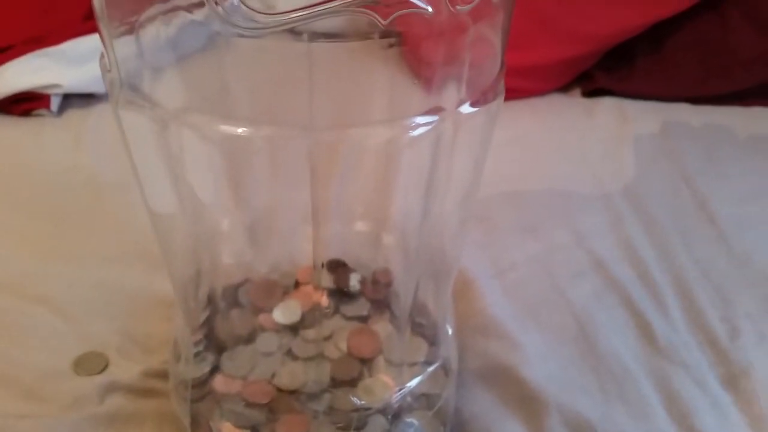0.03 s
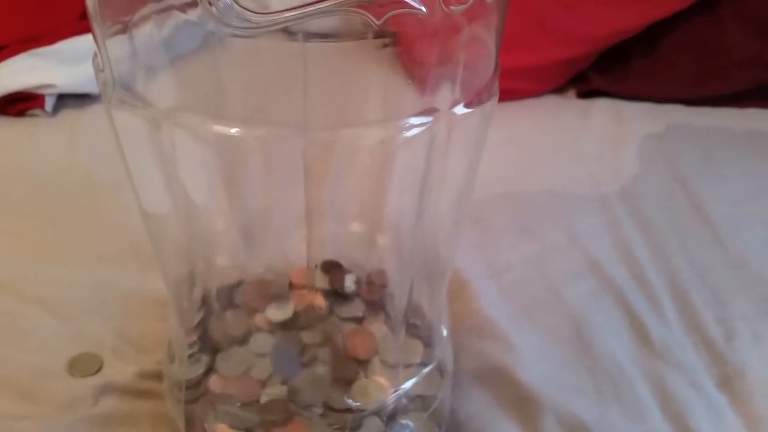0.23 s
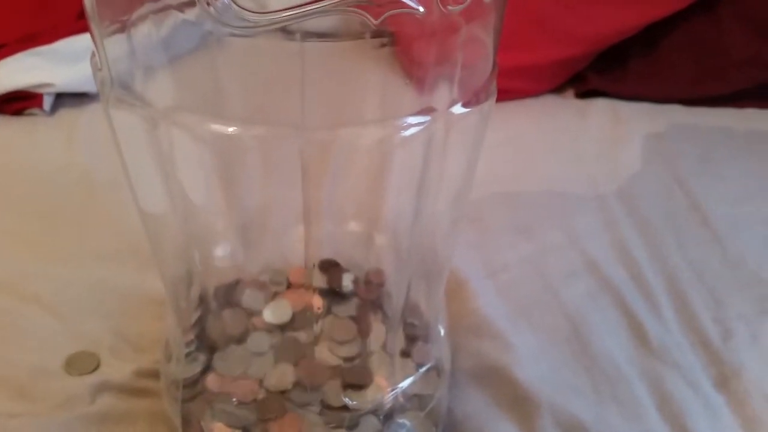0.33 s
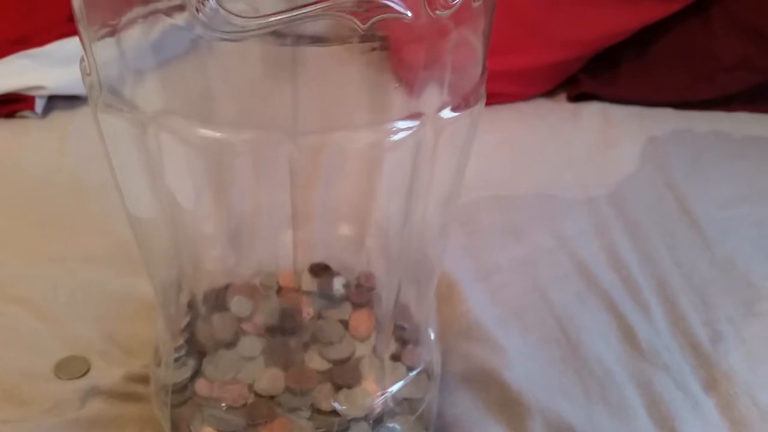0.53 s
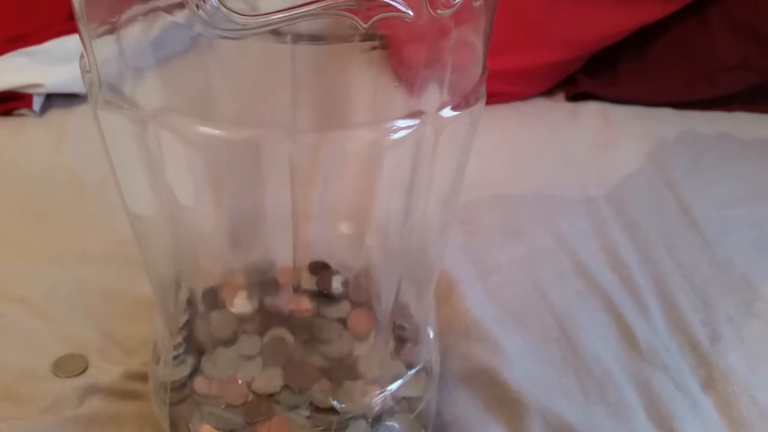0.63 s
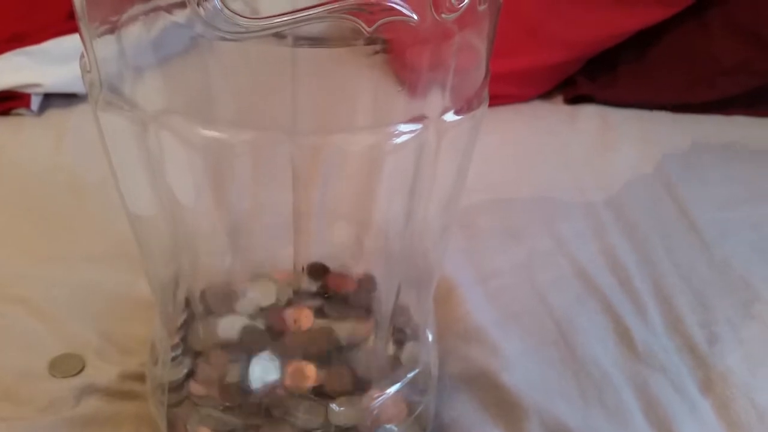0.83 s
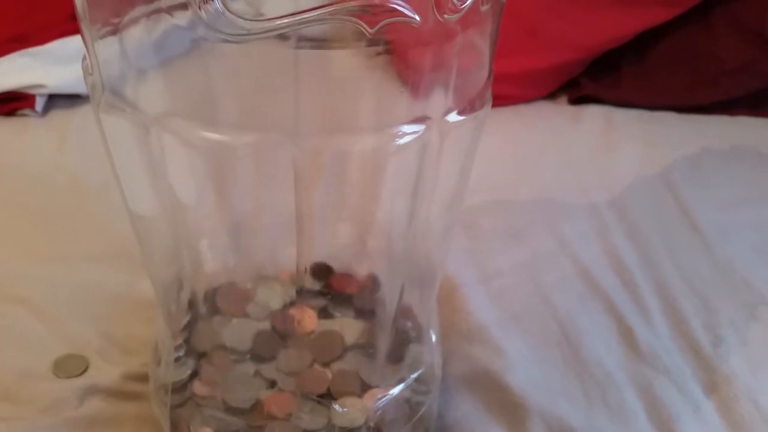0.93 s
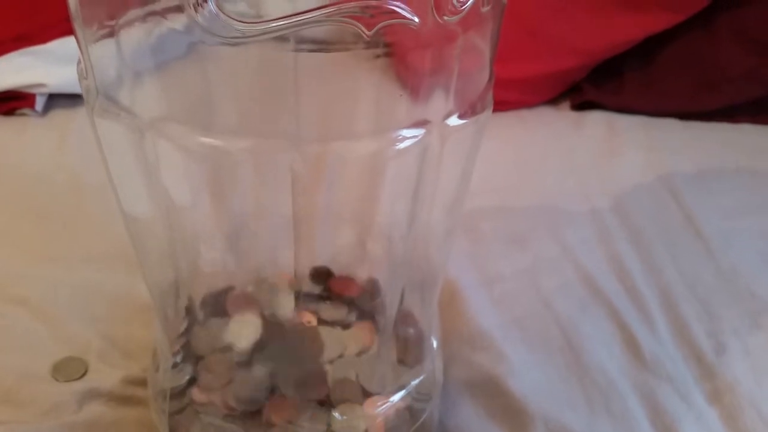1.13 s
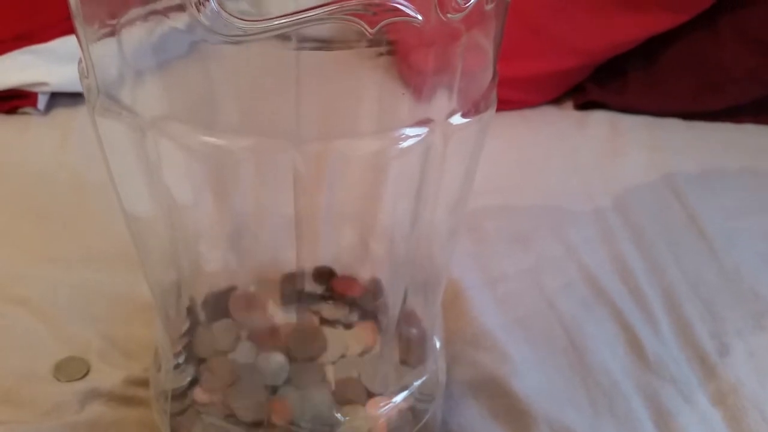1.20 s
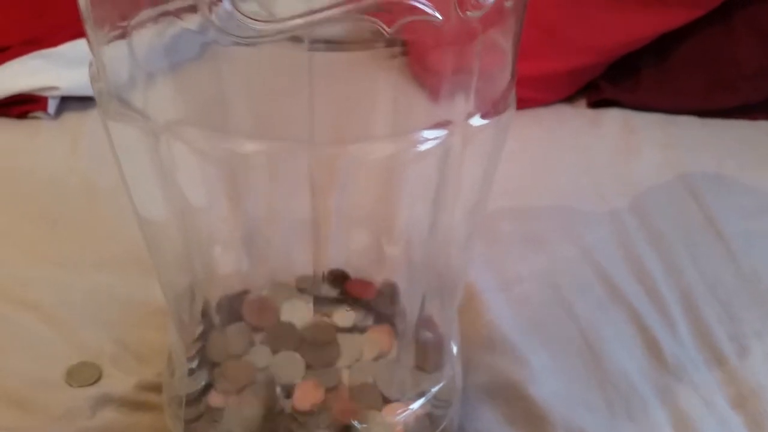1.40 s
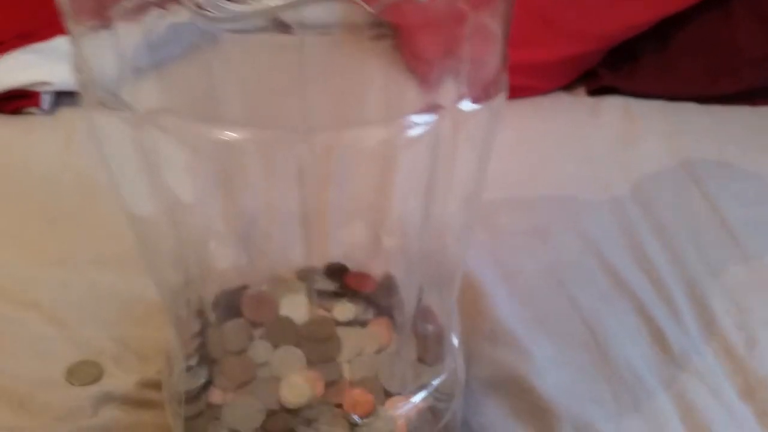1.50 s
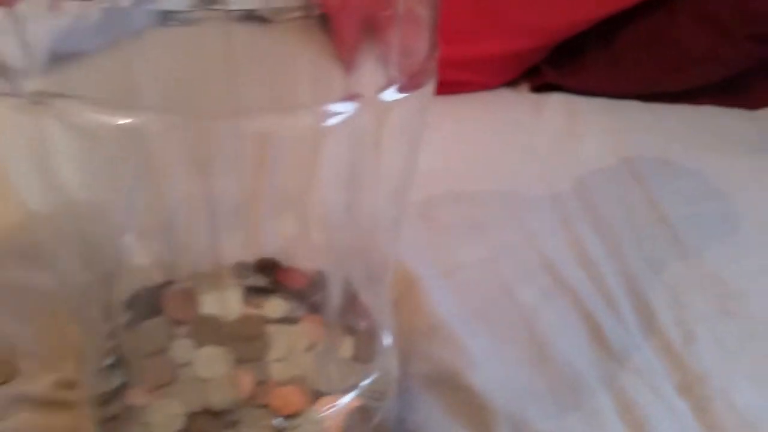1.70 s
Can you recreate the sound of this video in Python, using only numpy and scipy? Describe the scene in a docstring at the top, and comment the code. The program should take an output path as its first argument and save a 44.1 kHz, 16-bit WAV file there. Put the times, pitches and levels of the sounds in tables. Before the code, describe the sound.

Coins drop one after another into a big plastic bottle partly filled with coins. After a faint rustle, each landing knocks the hollow shell and sets the heap clinking with a very high ring. Indoors, close to the microphone.

```python
"""A faint rustle and a light clink, then coins land in a big plastic bottle partly filled with coins.
Each landing knocks the plastic shell, thumps the soft bed under it and sets the heap clashing.
Loose coins ring on very high, and the bottle's hollow prolongs the knocks.
Heard indoors, close to the microphone."""
import sys
import numpy as np
from scipy import signal
from scipy.fft import rfft, irfft, next_fast_len
from scipy.io import wavfile
from scipy.ndimage import uniform_filter1d, map_coordinates

SR = 44100
rng = np.random.default_rng(int(sys.argv[2]) if len(sys.argv) > 2 else 0)


def to_wav(sig):
    """Store sig (one row per channel, or 1-D mono) as 16-bit WAV at the path in sys.argv[1].

    Samples outside -1..1 are clipped; the rate is SR.
    """
    pcm = np.clip(np.atleast_2d(sig), -1, 1) * 32767
    pcm = np.round(pcm).astype(np.int16)
    wavfile.write(sys.argv[1], SR, pcm.T)  # frames by channels


N = 77175
T = np.arange(SR // 2) / SR  # time axis of one event, s


def amp(db):
    """Decibels to gain."""
    return 10 ** (np.asarray(db) / 20)


def unit(x):
    """Scale to rms 1."""
    return x / np.sqrt(np.mean(x ** 2) + 1e-20)


def onset_unit(x):
    """Scale the first 10 ms to rms 1."""
    return x / np.sqrt(np.mean(x[..., :SR // 100] ** 2) + 1e-20)


def along(points, hz):
    """Interpolate (Hz, value) points on a log axis."""
    knots_hz, values = np.transpose(points)
    return np.interp(np.log(hz + 1), np.log(knots_hz + 1), values)


def rise(attack_s):
    """Exponential attack from 0 to 1."""
    return 1 - np.exp(-T / attack_s)


def fade(t60_s):
    """Decay of 60 dB in t60_s."""
    return np.exp(-np.log(1000) * T / t60_s)


def wobble(knots_per_s, size):
    """Smooth random curve."""
    return map_coordinates(rng.standard_normal(4096), [np.arange(size) * knots_per_s / SR], mode="wrap")


def coloured(x, db_of_hz):
    """Minimum-phase filter with the given gain curve."""
    n = x.shape[-1]
    m = 2 * next_fast_len(n)
    cepstrum = irfft(np.log(amp(db_of_hz(np.fft.rfftfreq(m, 1 / SR))) + 1e-6))
    cepstrum[1:m // 2] *= 2
    cepstrum[m // 2 + 1:] = 0
    return irfft(rfft(x, m) * np.exp(rfft(cepstrum)), m)[..., :n]


def noise(spectrum, size=len(T)):
    """Two independent noises of rms 1, shaped by (Hz, dB) points."""
    return unit(coloured(rng.standard_normal((2, size)), lambda hz: along(spectrum, hz)))


def spread(pair, width):
    """Mid and side to left and right."""
    mid, side = pair
    return np.array([mid + width * side, mid - width * side]) / np.hypot(1, width)


def sine(hz):
    """Mono sine of peak 1."""
    return np.sin(2 * np.pi * hz * T)


def tone(hz):
    """Sine of rms 1, random phase per channel."""
    return np.sqrt(2) * np.sin(2 * np.pi * (hz * T + rng.random((2, 1))))


def add(track, start_s, sound):
    """Mix a sound into the track."""
    i = max(0, round(start_s * SR))
    track[:, i:i + len(T)] += sound[:, :N - i]


# Each row: frequency in Hz, relative level in dB.
RUSTLE_SPECTRUM = [(30, -22.5), (75, 1), (130, -8), (240, 6), (420, 1.5), (800, 1.5), (1400, -15.5),
                   (2500, -22), (5000, -26), (16000, -12)]
# Each row: time in seconds, rustle level in dB.
RUSTLE_LEVELS = [(0, -40.5), (0.079, -59.5), (.14, -53.5), (0.217, -54.5), (0.252, -32.5), (.45, -39),
                 (.75, -41), (1.02, -43), (1.4, -41), (1.58, -46), (1.669, -62.5)]


def settling():
    """The heap shifts and rustles against the shell."""
    level_db = np.interp(np.arange(N) / SR, *np.transpose(RUSTLE_LEVELS))
    rustle = spread(noise(RUSTLE_SPECTRUM, N), width=0.29)
    flicker_db = 3.1 * wobble(110, N)
    return amp(level_db) * unit(rustle * amp(flicker_db))


# Each row: frequency in Hz, relative level in dB.
ROOM_SPECTRUM = [(25, -4.5), (60, 1.5), (130, 1), (270, -10), (700, -22.5), (1500, -18.5), (3200, -37),
                 (6000, -24.5), (9000, -44.5), (16000, -38)]


def room():
    """Faint, steady, low room noise."""
    return amp(-61) * spread(noise(ROOM_SPECTRUM, N), width=0.56)


# Coins of the heap. Each row: pitch in Hz, relative level in dB.
HEAP_NOTES = [(5600, -18.5), (7150, -9.5), (8450, -11.5), (10450, -6), (11050, -3.5), (11650, -7.5),
              (12270, 1), (12600, 2), (12900, -1), (13370, -2.5), (14250, 1.5), (14550, 2.5), (14860, 4),
              (15100, -5), (15550, -6.5)]


def pings(clash_t60_s, count=30, ping_t60_s=0.055, detune=0.011, scatter_db=4.5):
    """A clash passes from coin to coin; each pings at its own pitch, later ones more weakly."""
    out = np.zeros((2, len(T)))
    t = T[:SR // 9]
    for k in range(count):
        hz, db = HEAP_NOTES[k % len(HEAP_NOTES)]
        delay_s = min(rng.exponential(0.08 * clash_t60_s), T[-len(t) - 1])
        hz = hz * (1 + detune * rng.standard_normal())
        gain = amp(db + scatter_db * rng.standard_normal((2, 1)))
        decay = np.exp(-np.log(1000) * (delay_s / clash_t60_s / 2 + t / ping_t60_s))
        i = int(delay_s * SR)
        out[:, i:i + len(t)] += gain * decay * np.sin(2 * np.pi * (hz * t + rng.random((2, 1))))
    return unit(out) * np.sqrt(np.mean(fade(clash_t60_s) ** 2))


COIN_ATTACK_S = 0.00035
# Each row: frequency in Hz, relative level in dB.
CLASH_SPECTRUM = [(300, -49.5), (900, -1.5), (2000, -10.5), (3500, -19.5), (5200, -19.5), (7100, -11),
                  (8500, -11), (9600, -14.5), (10400, -6), (12000, 0.5), (12700, 4), (13400, -6.5),
                  (13900, -2.5), (14550, 3), (15200, -5.5), (15800, -8.5)]
# Each row: start in seconds, level in dB, clash T60 in seconds.
COIN_HITS = [(.02, -38.5, 0.089), (0.2294, -28.5, 0.092), (.241, -25.5, 0.33), (0.264, -27.5, .3),
             (.311, -26, 0.28), (.357, -28, 0.66), (.391, -29, 0.13), (0.45, -30, 0.043),
             (.476, -28.5, 0.23), (.591, -22, 0.28), (0.66, -29, 0.13), (0.6967, -21.5, 0.72),
             (0.715, -22, 0.27), (.73, -23, 0.67), (0.762, -27.5, 0.82), (.79, -22.5, 0.44),
             (.842, -20, 0.31), (.858, -23.5, .27), (0.903, -30, 0.43), (.964, -31.5, 0.45),
             (1.0651, -23, 0.19), (1.102, -25, 0.21), (1.123, -27.5, 0.39), (1.1832, -23.5, .3),
             (1.271, -31.5, 0.49), (1.301, -24, 0.26), (1.326, -34, 0.54), (1.344, -32, 0.5),
             (1.3916, -25, 0.32), (1.403, -35, 0.57), (1.485, -36, 0.29), (1.529, -50, 0.31),
             (1.559, -43, 0.16), (1.598, -54, .13)]


def clinks():
    """Coin on coin: a crack, a clash roughened by small contacts, a shower of pings."""
    out = np.zeros((2, N))
    for start_s, db, t60_s in COIN_HITS:
        rattle = unit(amp(wobble(280, len(T))))
        clash = amp(-1.5) * noise(CLASH_SPECTRUM) * rattle * fade(t60_s)
        crack = amp(1) * noise([(1500, -1), (4000, -1.5), (7000, 13), (15000, 10)]) * fade(0.013)
        shower = amp(-3.5) * pings(t60_s)
        add(out, start_s, amp(db) * (crack + rise(COIN_ATTACK_S) * (clash + shower)))
    return out


# Each row: frequency in Hz, relative level in dB, T60 in seconds.
SHELL_MODES = [(243.4, -8.5, 0.54), (471.5, -1, 0.23), (535.3, 1.5, .14), (654.6, -3, 0.65),
               (751.6, 1.5, 0.33), (879, 2.5, 0.24), (1031, -9, 0.14), (1338, 2, 0.19), (1626, 2.5, 0.25),
               (2325, 0.5, 0.18)]


def shell_ring(scatter_db=3.5, detune=0.0025):
    """The plastic shell's modes ring with new strengths and slightly new pitches at each blow."""
    ring = np.zeros((2, len(T)))
    for hz, db, t60_s in SHELL_MODES:
        gain = amp(db + scatter_db * rng.standard_normal((2, 1)))
        ring += gain * fade(t60_s) * tone(hz * (1 + detune * rng.standard_normal()))
    return onset_unit(ring)


def wall_snap(hz=730, half_length_s=0.00058):
    """The wall's first flex: one short pulse."""
    t = T - 2 * half_length_s
    return onset_unit(np.cos(2 * np.pi * hz * t) * np.exp(-(t / half_length_s) ** 2))


def bed_thump(pitches_hz=(75.4, 100), detune=0.086):
    """The bottle thumps the soft bed under it."""
    low = sum(sine(hz * (1 + detune * rng.standard_normal())) for hz in pitches_hz)
    return low * fade(0.092) * rise(0.0085)


def edge_tick():
    """A coin's edge ticks on the plastic."""
    spectrum = [(1400, 10.5), (2300, 21), (4000, -2.5), (6800, 15), (9000, -11.5), (15000, -11)]
    return noise(spectrum) * fade(0.039)


# Each row: frequency in Hz, relative level in dB.
CLACK_SPECTRUM = [(40, -36.5), (130, -4), (230, 7), (330, -1), (450, 2), (900, -2), (1400, 2.5),
                  (2000, -6.5), (3500, -14.5), (7000, -17), (16000, -11)]
# Each row: start in seconds, level in dB, treble cutoff in Hz, thump level in dB,
# the struck spot's low and high pitch in Hz, its relative level in dB.
SHELL_BLOWS = [(.024, -42.5, 830, -76, 225, 655, 2), (0.2307, -23.5, 950, -38.5, 437, 704, 2.5),
               (0.2393, -36.5, 1480, -28, 400, 614, -5), (0.2629, -24, 1500, -36, 407, 695, -1),
               (0.3104, -27, 1250, -30.5, 470, 1190, 1.5), (.489, -30.5, 454, -69.5, 192, 650, -2),
               (0.5206, -26, 1050, -60.5, 243, 634, 3), (0.5374, -23.5, 1050, -60.5, 214, 605, 12.5),
               (0.5915, -16, 2270, -21, 532, 1254, -1.5), (0.659, -31.5, 1006, -38.5, 453, 760, -1),
               (0.6851, -20.5, 2700, -48, 243, 935, -17), (.697, -23.5, 2000, -31, 438, 920, -2),
               (.729, -30, 2224, -55, 263, 885, -12), (0.743, -27.5, 2010, -54, 234, 790, -8),
               (0.761, -26.5, 1640, -54, 424, 830, -4), (.787, -23, 2050, -25.5, 412, 790, -14),
               (.8, -29.5, 1520, -52.5, 192, 890, 4), (0.842, -31.5, 1790, -46, 421, 765, 8.5),
               (.86, -31, 2230, -38.5, 395, 855, -11), (.905, -27.5, 2970, -59.5, 378, 1450, -2),
               (0.9261, -24, 1890, -59, 334, 998, 1), (0.9344, -19, 1700, -55, 334, 992, 3.5),
               (0.9425, -25, 1500, -63.5, 264, 1060, -2), (0.9639, -29, 2370, -61, 412, 1370, 4.5),
               (1.0633, -29, 2180, -44, 428, 854, 2.5), (1.102, -32.5, 2200, -41.5, 247, 1270, 7),
               (1.124, -27.5, 1840, -39, 257, 844, 7.5), (1.1829, -25.5, 3670, -30, 421, 666, 2),
               (1.3002, -34.5, 1990, -41, 407, 860, 2.5), (1.345, -38, 1990, -39, 410, 840, -7),
               (1.373, -28.5, 3000, -60, 268, 1580, 9.5), (1.393, -25, 3060, -37.5, 246, 892, 1),
               (1.485, -40, 2605, -46, 265, 1620, 6), (1.526, -41, 1462, -61.5, 290, 900, -11),
               (1.598, -46, 900, -60, 430, 820, -7)]


def knocks(blow_t60_s=0.032, hollow_t60_s=0.26, air_hz=411.5):
    """A landing clacks the shell, rings the struck spot and wakes the hollow; glancing blows are duller."""
    out = np.zeros((2, N))
    attack = rise(0.00086)
    snap = amp(-4) * wall_snap()
    for start_s, db, cutoff_hz, thump_db, low_hz, high_hz, spot_db in SHELL_BLOWS:
        hardness = min(1, cutoff_hz / 2200)  # soft blows hardly ring the bottle
        decay = fade(blow_t60_s) + amp(-12) * hardness * fade(hollow_t60_s)
        burst = rng.standard_normal((2, len(T))) * attack * decay
        clack = onset_unit(coloured(burst, lambda hz: along(CLACK_SPECTRUM, hz)))
        ring = amp(-7.5) * hardness * attack * shell_ring()
        spot = sine(low_hz) * fade(0.035) + amp(7.5) * sine(high_hz) * fade(0.02)
        body = spread(clack + ring, width=0.31) + amp(spot_db) * onset_unit(attack * spot) + snap
        dulled = coloured(body, lambda hz: -10 * np.log10(1 + (hz / cutoff_hz) ** 3))
        thump = bed_thump()
        air_note = amp(-2.5) * attack * sine(air_hz) * fade(0.23)
        tick = amp(-12.5) * cutoff_hz / 2000 * edge_tick()
        add(out, start_s, amp(db) * (onset_unit(dulled) + tick) + amp(thump_db) * (thump + air_note))
    return out


def rocking_tone(hz, depth=0.49, flutter_per_s=80):
    """A rocking coin's tone wavers in strength and phase."""
    main = tone(hz) * (1 + depth * wobble(flutter_per_s, len(T)))
    shifted = depth * tone(hz) * wobble(flutter_per_s, len(T))
    return (main + shifted) / np.sqrt(1 + 2 * depth ** 2)


# Each row: start in seconds, hold in seconds, pitch in Hz, relative level in dB.
COIN_RINGS = [(.311, 0.086, 12870, -24.5), (0.313, 0.095, 12350, -29), (0.334, 0.25, 14570, -35.5),
              (0.449, 0.012, 8480, -27.5), (0.482, 0.069, 8460, -44), (0.487, .05, 12720, -35),
              (.545, 0.035, 12680, -28.5), (.591, 0.037, 12680, -24.5), (.594, .02, 15100, -17),
              (.61, 0.066, 14480, -32), (0.67, 0.03, 15060, -27), (.716, 0.073, 14750, -24),
              (.73, 0.1, 12720, -33), (0.836, 0.054, 14650, -20.5), (0.855, 0.065, 12760, -26),
              (0.907, 0.057, 14560, -33), (0.962, 0.087, 12470, -35), (0.986, 0.057, 12900, -36),
              (1.065, 0.036, 14460, -21.5), (1.07, 0.045, 8280, -46), (1.097, 0.079, 13400, -24.5),
              (1.185, 0.047, 12830, -30.5), (1.206, 0.093, 8300, -44.5), (1.216, 0.12, 14300, -32.5),
              (1.301, 0.056, 12790, -23.5), (1.307, 0.053, 8490, -34.5), (1.324, 0.027, 14450, -28),
              (1.378, .1, 12720, -29), (1.395, 0.044, 13515, -26.5), (1.44, 0.037, 14510, -34),
              (1.481, 0.052, 13200, -36), (1.5, 0.11, 12800, -39.5)]


def loose_coins(sag_db=4.5, damped_t60_s=0.12):
    """A coin bounces free, holds its note, then is damped as it lies down."""
    out = np.zeros((2, N))
    for start_s, hold_s, hz, db in COIN_RINGS:
        sag = amp(-sag_db * T / hold_s)
        damping = np.exp(-np.log(1000) * np.maximum(T - hold_s, 0) / damped_t60_s)
        add(out, start_s, amp(db - 2) * rise(COIN_ATTACK_S) * sag * damping * rocking_tone(hz))
    return out


def hollow_ripple_db(hz, spacing_hz=69.76):
    """Close-set peaks and dips from the bottle's air resonances."""
    ripple = map_coordinates(rng.standard_normal(1024), [hz / spacing_hz], mode="wrap")
    return 4 * ripple * np.interp(hz, [1200, 2200, 9000, 12000], [0.028, 0.86, 1.0, 0.077])


# Each row: frequency in Hz, left minus right in dB.
STEREO_BALANCE = [(100, 0.5), (400, -2), (900, -4.5), (1450, -15.5), (2200, -0.5), (5000, 2), (6300, -5),
                  (7900, -8.5), (8600, -1.5), (10000, -0.5), (12000, 6), (14000, 9.5), (15800, 1)]


def bottle_colour(channel, side):
    """The bottle colours the sound and pans each pitch range; side is -1 left, 1 right."""
    def gain_db(hz):
        other_side_gain = amp(side * along(STEREO_BALANCE, hz))
        return hollow_ripple_db(hz) + 10 * np.log10(2 / (1 + other_side_gain ** 2))
    return coloured(channel, gain_db)


def scene():
    """Coins in the bottle, over a quiet room."""
    left, right = knocks() + clinks() + loose_coins() + settling()
    return np.array([bottle_colour(left, -1), bottle_colour(right, 1)]) + room()


def record(dry, low_cut_hz=56, top_hz=15800, gate_db=-48, gate_window_s=0.043):
    """The microphone loses deep bass, a soft gate lowers quiet passages, a low-pass caps the treble."""
    thin = signal.sosfilt(signal.butter(2, low_cut_hz, "high", fs=SR, output="sos"), dry)
    power = uniform_filter1d(np.mean(thin ** 2, axis=0), int(gate_window_s * SR))
    level_db = 10 * np.log10(np.abs(power) + 1e-12)
    gain_db = np.clip(0.48 * (level_db - gate_db), -13, 0)
    return signal.sosfilt(signal.ellip(10, .2, 80, top_hz, fs=SR, output="sos"), thin * amp(gain_db))


dry = scene()
out = record(dry)
to_wav(out)
```